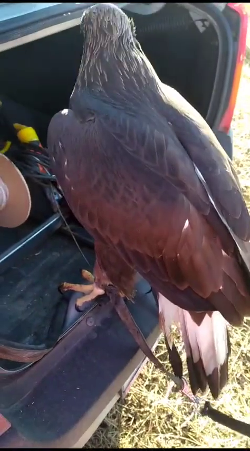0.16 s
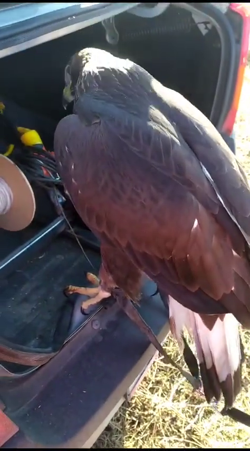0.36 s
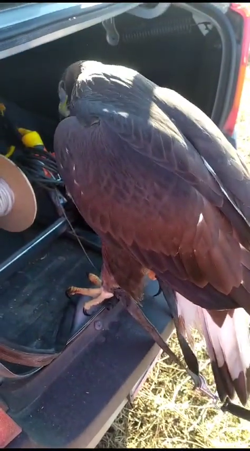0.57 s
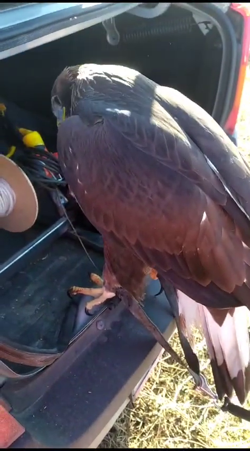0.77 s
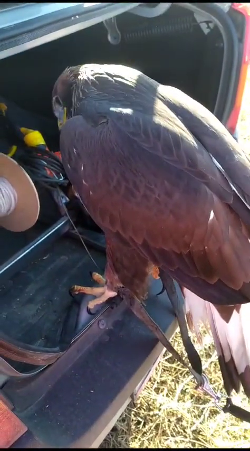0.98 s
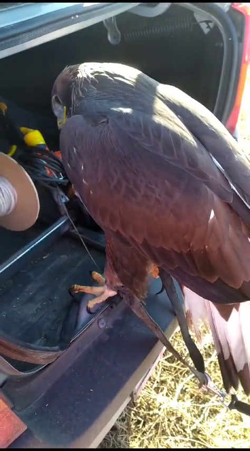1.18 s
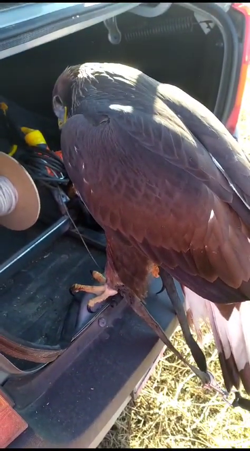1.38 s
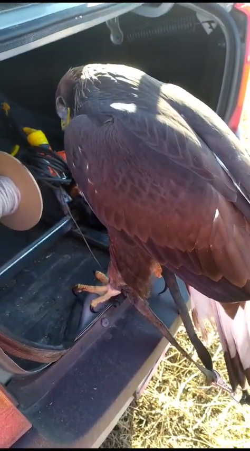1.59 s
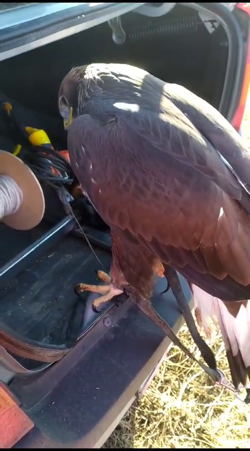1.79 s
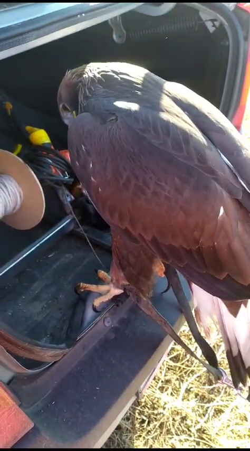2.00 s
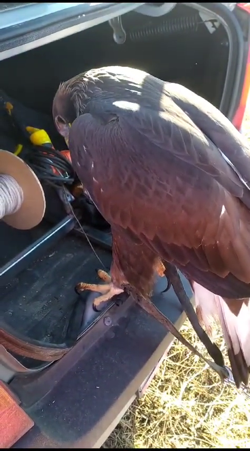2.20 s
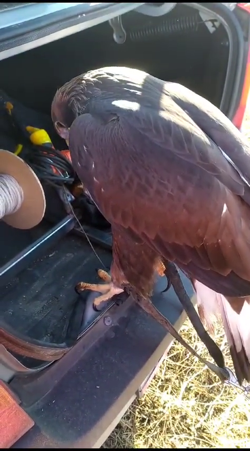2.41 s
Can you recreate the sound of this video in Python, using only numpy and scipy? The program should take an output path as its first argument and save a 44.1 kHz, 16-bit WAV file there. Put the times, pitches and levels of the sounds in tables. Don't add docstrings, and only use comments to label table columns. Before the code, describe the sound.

Single high wavering yelp from a large raptor, breaking downward, with soft feather swishes and wind buffeting

```python
import sys
import numpy as np
from scipy import signal
from scipy.fft import rfft, irfft
from scipy.io import wavfile
from scipy.ndimage import uniform_filter1d

SR = 44100
rng = np.random.default_rng(int(sys.argv[2]) if len(sys.argv) > 2 else 0)


def master(y):
    cut = np.clip(np.atleast_2d(y).T, -1, 1)
    pcm = np.round(cut * 32767)
    wavfile.write(sys.argv[1], SR, pcm.astype(np.int16))


def ratio(d):
    e = np.asarray(d, float) / 20
    return 10 ** e


N = 107868
T = np.arange(N) / SR

# (frequency [Hz], level per Hz [dB])
WASH_COLOUR = [(18, -30), (30, 5.5), (287, -14), (333, -9), (373, -13.5), (1020, -11.5), (2600, -34),
               (3380, -52), (5720, -120)]
WASH_DB = -51
# (frequency [Hz], likeness [0-1])
WASH_LIKENESS = [(60, 0.98), (380, 0.91), (2380, 0.32), (15000, 0.03)]
# (frequency [Hz], likeness [0-1])
UNRELATED = [(100, 0), (9000, 0)]
# (frequency [Hz], level per Hz [dB])
TRAFFIC_COLOUR = [(600, -26), (1000, 5.5), (1500, -0.5), (2300, -33.5)]
# (time [s], level [dB])
TRAFFIC_LEVEL = [
    (0, -72.5),
    (1.7, -57.5),
    (2.1, -59),
    (2.45, -52.5),
]
# (frequency [Hz], level [dB rms])
HUM_LINES = [(172.3, -66.5), (344.5, -69.5), (1663, -72)]
# (frequency [Hz], level per Hz [dB])
HISS_COLOUR = [(1500, -8), (3000, -1), (5000, -2), (9000, 0), (11000, -6), (13000, -13), (15800, -26)]
HISS_DB, HISS_SINK_DB_PER_S = -71, 7
FAR_LAG = 8

# (frequency [Hz], level per Hz [dB])
GUST_COLOUR = [(25, -50), (45, -14), (80, 2), (120, 1), (220, -18), (442, -33), (700, -48), (1540, -120)]
# (centre [s], half width [s], level [dB])
LEFT_PUFFS = [(1.855, 0.018, -59), (1.925, 0.023, -40), (2.005, 0.033, -30.5), (2.035, 0.011, -30),
              (2.085, 0.016, -29), (2.13, 0.023, -37), (2.19, 0.0055, -31.5), (2.235, 0.014, -28),
              (2.262, 0.012, -24.5), (2.312, 0.012, -22), (2.345, 0.0086, -21), (2.368, 0.0078, -22.5),
              (2.41, 0.042, -33)]
# (centre [s], half width [s], level [dB])
RIGHT_PUFFS = [
    (.015, 0.01, -45),
    (1.95, 0.086, -56.5),
    (2.2, 0.052, -45.5),
    (2.42, 0.053, -46),
]
# (frequency [Hz], level per Hz [dB])
SLAP_COLOUR = [(90, -24), (200, 5), (300, 1), (430, -10), (700, -73)]
# (centre [s], half width [s], level [dB])
SLAP_PUFFS = [
    (1.989, 0.011, -42),
    (2.024, 0.0095, -32),
    (2.074, 0.0074, -37),
    (2.098, 0.0068, -42.5),
    (2.26, 0.0065, -40),
    (2.347, 0.013, -29.5),
    (2.365, 0.0046, -37),
    (2.383, 0.0056, -38.5),
]

# (frequency [Hz], level per Hz [dB])
SHAKE_COLOUR = [(300, 11), (800, 0.5), (2000, -11), (4000, -9), (8000, -4), (11000, -5), (15500, -10.5)]
# (frequency [Hz], level per Hz [dB])
PREEN_COLOUR = [(2000, -6), (4500, 0.5), (6500, 8.5), (9000, 9), (12000, -1), (15500, -30)]
# (time [s], level [dB])
SHAKE_LEVEL = [
    (0, -47),
    (.04, -47),
    (.075, -50.5),
    (.09, -58),
    (.12, -55),
    (.16, -65.5),
    (.29, -65),
    (.305, -60),
    (.33, -70.5),
]
# (time [s], level [dB])
PREEN_LEVEL = [
    (1.93, -89),
    (1.99, -71.5),
    (2.035, -63.5),
    (2.07, -62),
    (2.11, -74.5),
    (2.17, -72),
    (2.24, -98),
]
# (frequency [Hz], likeness [0-1])
FEATHER_LIKENESS = [(100, 0.22), (1500, 0.83), (9000, 0.084)]

# (time [s], pitch [Hz], level [dB])
LOW_RISE = [
    (1.097, 2510, -97),
    (1.102, 2613, -56.5),
    (1.125, 2640, -51),
    (1.15, 2856, -49.5),
    (1.175, 2934, -70.5),
    (1.205, 3004, -49.5),
    (1.25, 2908, -63),
    (1.29, 2851, -47),
    (1.335, 2782, -60),
]
# (time [s], pitch [Hz], level [dB])
LOW_LEAP = [
    (1.35, 2772, -51),
    (1.37, 2850, -50),
    (1.392, 2990, -53),
    (1.408, 3195, -45),
    (1.42, 3232, -44),
    (1.437, 3160, -44),
    (1.445, 2520, -55),
    (1.458, 2560, -55),
    (1.466, 2600, -85),
]
# (time [s], pitch [Hz], level [dB])
HIGH_FIRST = [
    (1.15, 3500, -103),
    (1.17, 3450, -75),
    (1.195, 3520, -90),
    (1.215, 3430, -56.5),
    (1.241, 3413, -49),
    (1.271, 3396, -57.5),
    (1.289, 3370, -70),
    (1.305, 3200, -71),
]
# (time [s], pitch [Hz], level [dB])
HIGH_SECOND = [
    (1.362, 3450, -95),
    (1.376, 3410, -62),
    (1.388, 3390, -51),
    (1.405, 3465, -45),
    (1.417, 3530, -50),
    (1.429, 3480, -42),
    (1.437, 3420, -52),
    (1.443, 3400, -95),
]
# (multiple of lower, multiple of upper, level [dB], extra under strain [dB])
MIXES = [(1, 0, 0, 0), (0, 1, 0, 0), (2, 0, -16, -4), (1, 1, -6, -4), (0, 2, -24, 10), (-1, 2, -32, 17),
         (2, -1, -22, 0), (-1, 3, -30, 12), (3, 0, -28, 0), (2, 1, -11, -8), (1, 2, -28, 8),
         (0, 3, -36, 12), (4, 0, -30, -8)]
MIX_ONSET_DB, BLOOM_S, STRAIN_S, STRAIN_JITTER = -60, .11, 1.385, .007

# (start [s], first pitch [Hz], last pitch [Hz], level [dB], roughness [0-1])
BREAKS = [(1.444, 990, 1080, -44, .22), (1.451, 1210, 1380, -46, .26), (1.461, 1870, 1870, -42, .18),
          (1.470, 1060, 1060, -44, .2), (1.477, 1150, 1400, -45, .26), (1.487, 1930, 1990, -38, .24),
          (1.504, 1985, 1770, -35, .16), (1.531, 1240, 1160, -40, .24), (1.548, 1140, 985, -43, .09),
          (1.578, 665, 600, -43, .19), (1.600, 590, 500, -49, .13)]
TAIL_END_S, CATCH_S, CATCH_WIDTH_S, RELEASE_S, JITTER = 1.624, 1.574, .007, .016, .07
# (frequency [Hz], level [dB])
OVERTONES = [(500, 0), (1200, -3), (2500, -5), (3200, -14), (4000, -13), (4700, -30), (6200, -19),
             (11000, -40)]
# (frequency [Hz], level per Hz [dB])
RASP_COLOUR = [(400, -20), (1000, 8), (3900, 2), (4600, -18), (5800, 2.5), (8200, -14.5), (9800, -3),
               (10900, -57)]
# (start [s], end [s], cycles per pattern, depth [0-1])
UNEVEN = [
    (1.463, 1.487, 2, .15),
    (1.488, 1.506, 3, .2),
    (1.506, 1.524, 3, .06),
    (1.534, 1.560, 2, .18),
]

# (delay [ms], gain)
LEFT_PATHS = [(.27, .85), (5.971, -.58), (11.289, .36), (11.622, -.42)]
# (delay [ms], gain)
RIGHT_PATHS = [(0., 1.), (1.158, .33), (7.438, .36), (12.724, .44)]
# (frequency [Hz], level [dB])
SHADOW = [(1000, 5), (3000, -3), (8000, -16.5)]
PANEL_HZ = 2000
BOOT_DB, BOOT_T60_S = -19, .08

MIC_LOW_HZ, EDGE_HZ = 44, 15750
MASK_DB, MASK_FROM_HZ, MASKED_DB = -26, 2500, -14


def evened(x):
    return x / np.sqrt(np.mean(x ** 2) + 1e-20)


def read(points, hz):
    f, value = np.transpose(points)
    return np.interp(np.log(hz + 1), np.log(f + 1), value)


def curve(points, column=1, size=1):
    points = np.array(points, float)
    return uniform_filter1d(np.interp(T, points[:, 0], points[:, column]), size)


def drift(rate):
    coarse = T[::16]
    sines = sum(np.sin(2 * np.pi * (f * coarse + rng.random())) / np.sqrt(f)
                for f in np.geomspace(rate / 10, rate, 20))
    return evened(np.interp(T, coarse, sines))


def noise(colour, same, patchy_db):
    frames, hz = N // 256 + 5, np.fft.rfftfreq(1024, 1 / SR)
    a, b, c, d, patches = rng.standard_normal((frames, 513, 5)).T
    patches = uniform_filter1d(patches, size=10, axis=0)
    patches = evened(uniform_filter1d(patches, size=10, axis=1))
    same = np.clip(read(same, hz), -1, 1)[:, None]
    left = a + 1j * b
    right = same * left + np.sqrt(1 - same ** 2) * (c + 1j * d)
    level = ratio(read(colour, hz)[:, None] + patchy_db * patches) * (hz > 0)[:, None]
    z = np.array([left, right]) * level
    return evened(signal.istft(z, nperseg=1024, noverlap=768)[1][:, :N])


def background():
    wash = ratio(WASH_DB + .5 * drift(5.28)) * noise(WASH_COLOUR, WASH_LIKENESS, patchy_db=1.0)
    road = ratio(curve(TRAFFIC_LEVEL) + drift(6.4)) * noise(TRAFFIC_COLOUR, UNRELATED, patchy_db=0.5)
    hum = 0
    for hz, db in HUM_LINES:
        level = np.sqrt(2) * ratio(db + 3.36 * drift(14))
        turns = np.cumsum(hz * (1 + 0.0026 * drift(6))) / SR
        hum = hum + level * np.sin(2 * np.pi * turns)
    hiss = ratio(HISS_DB - HISS_SINK_DB_PER_S * T) * noise(HISS_COLOUR, UNRELATED, patchy_db=3.5)
    far = wash + hum
    return np.array([np.roll(far[0], FAR_LAG), far[1]]) + road + hiss


def puff_power(puffs):
    return sum(ratio(2 * db) * np.exp(-((T - centre) / width) ** 2) for centre, width, db in puffs)


def wind():
    air = noise(GUST_COLOUR, UNRELATED, patchy_db=4.2)
    air = air / np.sqrt(uniform_filter1d(air ** 2, size=700, axis=1) + 0.08)
    power = np.array([puff_power(LEFT_PUFFS), puff_power(RIGHT_PUFFS)])
    body = np.sqrt(power) * ratio(1.5 * drift(60)) * air
    edge = noise(SLAP_COLOUR, UNRELATED, patchy_db=2.3)[0]
    edge = edge / np.sqrt(uniform_filter1d(edge ** 2, size=300) + 0.057)
    return body + np.array([[1], [0]]) * np.sqrt(puff_power(SLAP_PUFFS)) * edge


def feathers():
    port_db = np.array([[-3.5], [2.5]])
    shake_level = ratio(curve(SHAKE_LEVEL) + 0.57 * drift(180.0) + port_db)
    shake = shake_level * noise(SHAKE_COLOUR, FEATHER_LIKENESS, patchy_db=1.0)
    preen_level = ratio(curve(PREEN_LEVEL) + 0.95 * drift(130))
    return shake + preen_level * noise(PREEN_COLOUR, FEATHER_LIKENESS, patchy_db=1.5)


def whistles():
    low, high = LOW_RISE + LOW_LEAP, HIGH_FIRST + HIGH_SECOND
    strain = np.clip((T - STRAIN_S) / .04, 0, 1)
    wobble = .0012 + STRAIN_JITTER * strain ** 2
    bloom = np.clip((T - low[0][0]) / BLOOM_S, 0, 1)
    low_turns, high_turns = [np.cumsum(curve(voice, size=300) * (1 + wobble * drift(400))) / SR
                             for voice in (low, high)]
    low_db, high_db = curve(low, column=2, size=120), curve(high, column=2, size=120)
    faint = np.minimum(high_db - MIX_ONSET_DB, 0)
    tones = 0
    for m, n, db, strain_db in MIXES:
        order = abs(m) + abs(n)
        voices_db = (abs(m) * low_db + abs(n) * high_db) / order
        level = ratio(db + strain_db * strain + (m * n != 0) * faint + voices_db) * bloom ** (order - 1)
        tones = tones + level * np.sin(2 * np.pi * (round(m) * low_turns + round(n) * high_turns))
    on = (T > low[0][0]) & (T < low[-1][0])
    return np.sqrt(2) * on * tones


def broken_tail():
    start, first, last, db, rough = np.transpose(BREAKS)
    ends = np.append(start[1:], TAIL_END_S)
    k = np.clip(np.searchsorted(start, T) - 1, 0, len(start) - 1)
    along = np.clip((T - start[k]) / (ends - start)[k], 0, 1)
    rough = np.clip(uniform_filter1d(rough[k], size=90), 0, 1)
    hz = uniform_filter1d(first[k] + (last - first)[k] * along, size=50)
    jitter = JITTER * rough * evened(uniform_filter1d(rng.standard_normal(N), size=60))
    turns = np.cumsum(hz * (1 + jitter)) / SR

    dull_db = np.maximum(7.5 - 32 * rough, 1)
    folds = 0
    for n in range(1, 16):
        overtone_db = read(OVERTONES, n * hz) - read(OVERTONES, hz) - dull_db * (n - 1)
        folds = folds + ratio(overtone_db) * np.cos(2 * np.pi * n * turns)
    folds = folds * (1 + sum(2 * depth * (T > a) * (T < b) * np.cos(2 * np.pi * turns / cycles)
                             for a, b, cycles, depth in UNEVEN))
    rasp = noise(RASP_COLOUR, UNRELATED, patchy_db=2.0)[0] * (0.86 + np.cos(np.pi * turns) ** 2)

    edges = np.clip((T - start[0]) / 0.0014, 0, 1) * np.clip((TAIL_END_S - T) / RELEASE_S, 0, 1)
    catch = 1 - .9 * np.exp(-((T - CATCH_S) / CATCH_WIDTH_S) ** 2)
    level = edges * catch * ratio(uniform_filter1d(db[k], size=130) + drift(150))
    return level * ((1 - rough) * np.sqrt(2) * folds + rough * rasp)


def boot(voice):
    hz, z = np.fft.rfftfreq(N, 1 / SR), rfft(voice)
    panel = hz ** 4 / (hz ** 4 + PANEL_HZ ** 4)
    ports = []
    for paths in (LEFT_PATHS, RIGHT_PATHS):
        response = sum(gain * (panel if ms > 1 else 1) * np.exp(-2j * np.pi * hz * ms / 1000)
                       for ms, gain in paths)
        ports.append(irfft(z * response, N))
    shaded = irfft(rfft(ports[0]) * ratio(read(SHADOW, hz)), N)
    near = np.array([shaded, ports[1]])

    t = np.arange(6000) / SR
    taps = rng.choice([-1., 1.], (2, 6000)) * (rng.random((2, 6000)) < .05)
    taps = taps * ratio(-60 * t / BOOT_T60_S) * (t > .002)
    tail = signal.fftconvolve(voice[None], taps / np.linalg.norm(taps[0]), axes=1)[:, :N]
    return near + ratio(BOOT_DB) * tail


def scene():
    return boot(whistles() + broken_tail()) + background() + feathers() + wind()


def masked(x):
    hz, t, z = signal.stft(x, SR, nperseg=1024, noverlap=768)
    power = (abs(z) ** 2).mean(0) * (hz > MASK_FROM_HZ)[:, None]
    nearby = uniform_filter1d(power, size=70, axis=0)
    faint = uniform_filter1d(power, size=5, axis=0) < ratio(2 * MASK_DB) * nearby
    gain = ratio(MASKED_DB * faint * (hz > 1.5 * MASK_FROM_HZ)[:, None])
    return signal.istft(z * gain, SR, nperseg=1024, noverlap=768)[1][:, :N]


def low_pass(x):
    return signal.sosfilt(signal.butter(12, 15990, fs=SR, output="sos"), x)


def record(dry):
    hz = np.fft.rfftfreq(N, 1 / SR)
    bass_cut = (hz / MIC_LOW_HZ) ** 6 / (1 + (hz / MIC_LOW_HZ) ** 6)
    mix = masked(irfft(rfft(dry) * bass_cut * (hz < EDGE_HZ), N))
    return low_pass(mix)


dry = scene()
out = record(dry)
master(out)
```